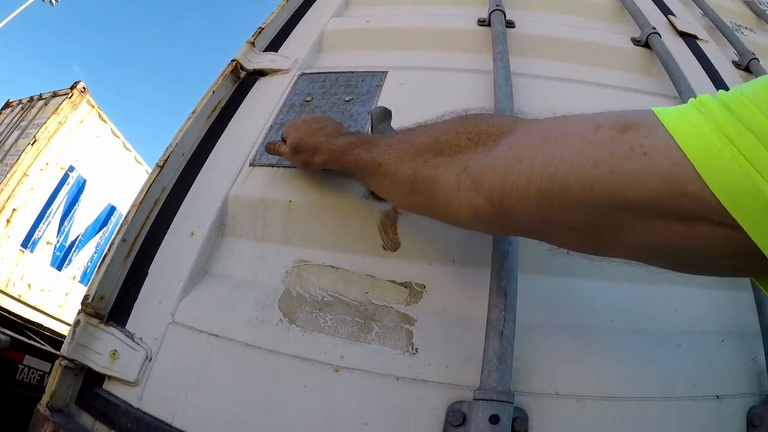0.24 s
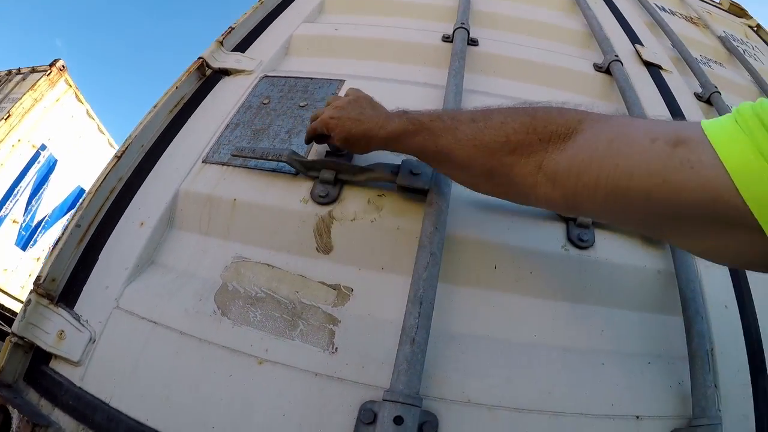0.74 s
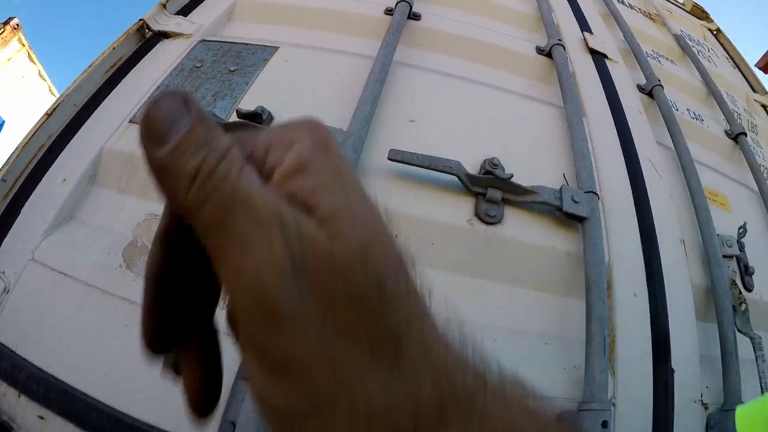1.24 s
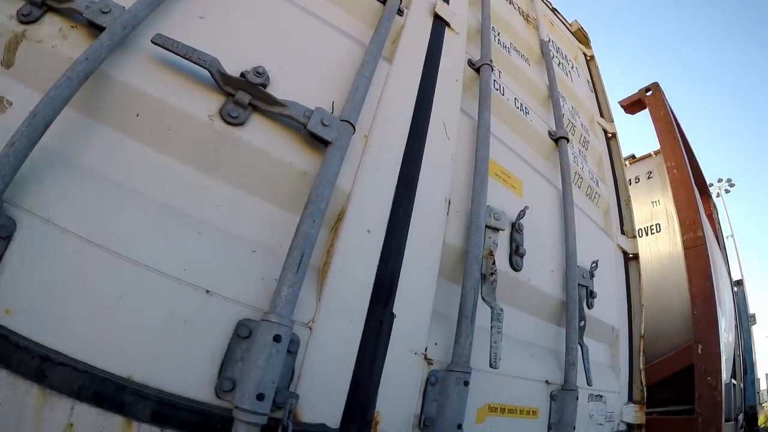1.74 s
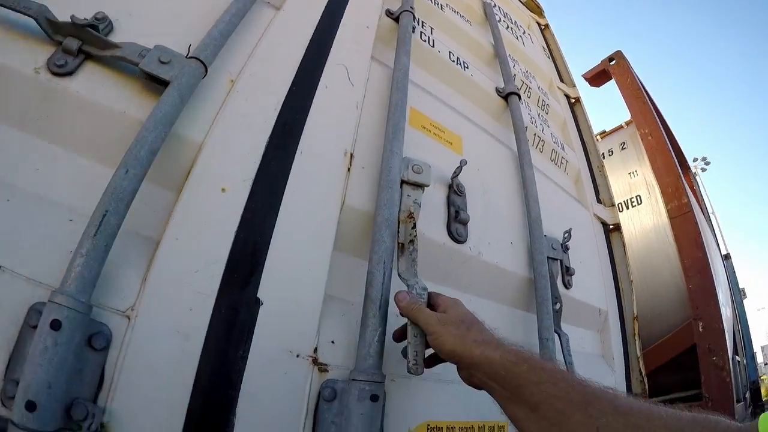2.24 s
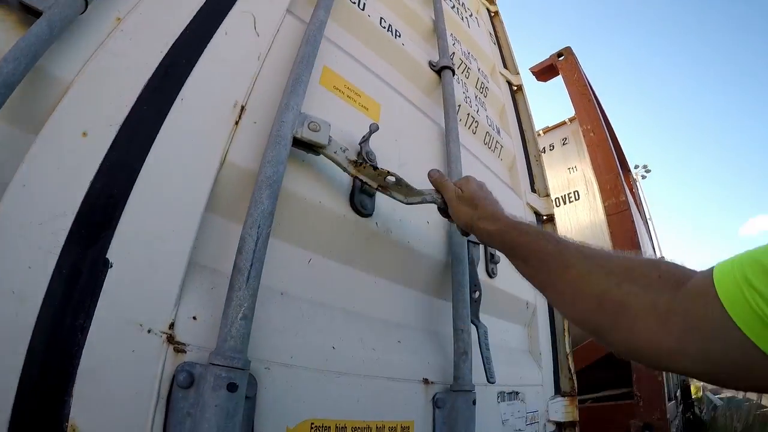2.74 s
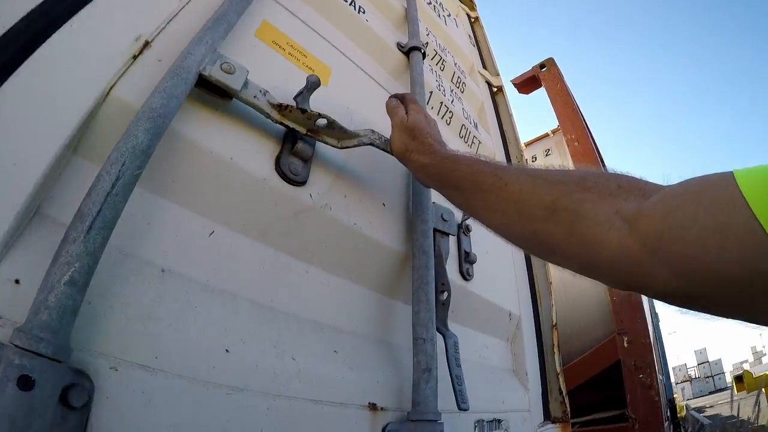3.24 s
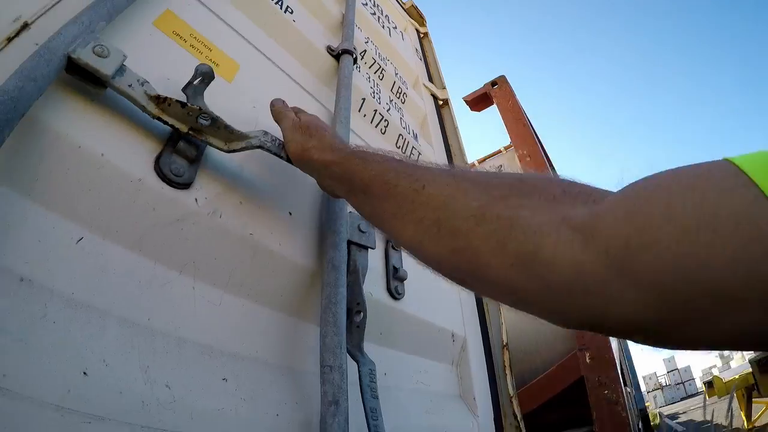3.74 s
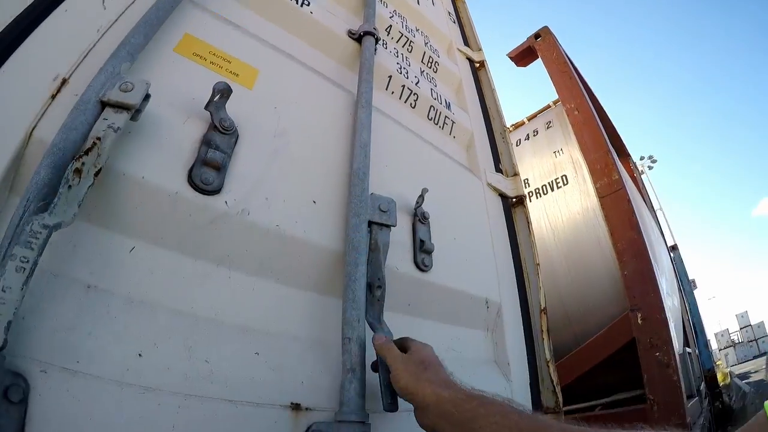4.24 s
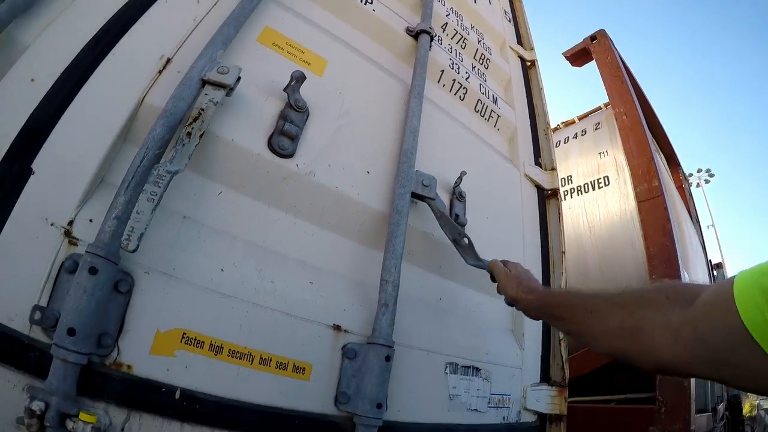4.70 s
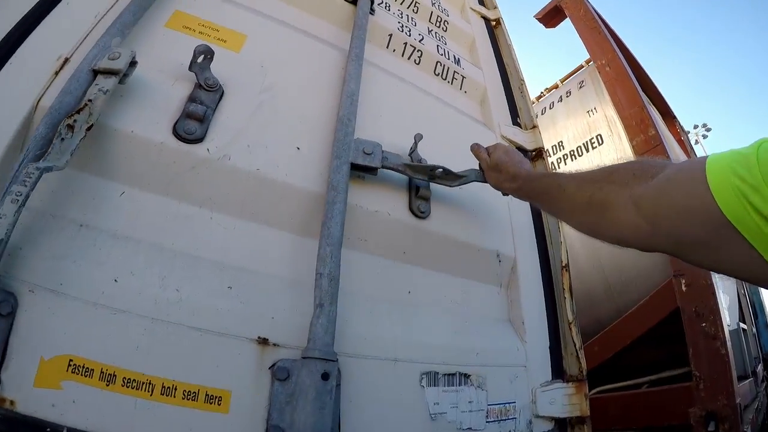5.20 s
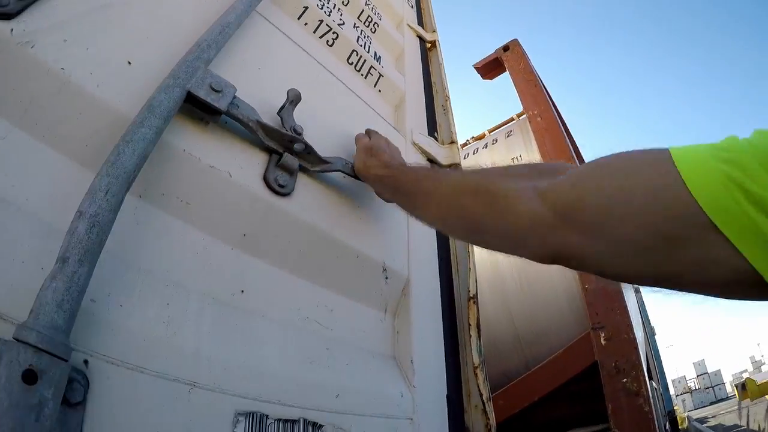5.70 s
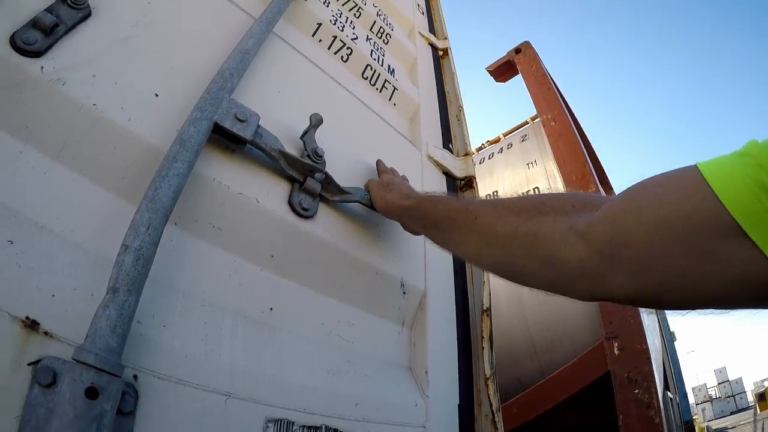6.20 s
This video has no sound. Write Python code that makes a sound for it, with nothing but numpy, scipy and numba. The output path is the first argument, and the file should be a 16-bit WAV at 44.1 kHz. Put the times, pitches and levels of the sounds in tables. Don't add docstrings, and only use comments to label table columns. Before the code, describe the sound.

Low engine drone and distant yard hum underlie sharp metal handling at arm's length. One latch knocks and rattles, another scrapes, clacks and thumps, then a steel handle falls and rings like a bar. After a quieter gap the last latch slams with hollow boom and jangling parts, followed by one more solid knock. Action-camera sound, wide, with the background ducking after blows.

```python
import sys
import numpy as np
from scipy import signal
from scipy.fft import rfft, irfft
from scipy.io import wavfile
from scipy.ndimage import uniform_filter1d
from numba import njit

SR = 44100
rng = np.random.default_rng(int(sys.argv[2]) if len(sys.argv) > 2 else 0)


def wav_record(signal):
    frames = np.transpose(np.atleast_2d(signal))
    bounded = np.clip(frames, -1, 1)
    quanta = np.round(bounded * 32767).astype(np.int16)
    wavfile.write(sys.argv[1], SR, quanta)


def level_to_linear(level):
    exponent = np.asarray(level, float) / 20
    return 10 ** exponent


N = 284886


def on_log(hz, table, column=1):
    rows = np.array(table, float)
    return np.interp(np.log(np.maximum(hz, 1)), np.log(rows[:, 0]), rows[:, column])


def curve(table):
    return np.interp(np.arange(N) / SR, *np.array(table, float).T)


def unit(x):
    return x / np.sqrt(np.mean(x ** 2))


def walk(rate):
    k = int(SR / rate)
    steps = np.repeat(rng.standard_normal(N // k + 1), k)
    return unit(uniform_filter1d(uniform_filter1d(steps, k), k)[:N])


# (frequency [Hz], left minus right level [dB], right lead [rad],
# likeness of distant sound [0-1])
MICROPHONES = [(60, .2, -.2, .93), (170, .4, -.45, .97), (270, -1.5, -.7, .8), (340, 2, 1.7, .6),
               (470, 9.5, 2.1, .85), (800, 4, 2.25, .97), (1100, 0, 2.1, .96), (1700, -1, 1.6, .85),
               (2200, 0, 1.0, .75), (4000, 1, .4, .65), (5200, 6, .3, .15), (7000, 10, 1, .1),
               (9000, 0, 1, .1), (12000, -3, 1, .1)]


def shaped_noise(gain):
    hz = np.fft.rfftfreq(N, 1 / SR)
    like = np.clip(on_log(hz, MICROPHONES, column=3), 0, 1)
    a, b = rfft(rng.standard_normal((2, N))) * gain(hz)
    return irfft(np.array([a, like * a + np.sqrt(1 - like ** 2) * b]), N)


@njit
def add(out, start, hz, gain, t60, turn, rise):
    for k in range(len(hz)):
        p = np.exp(2j * np.pi * hz[k] / SR - np.log(1000) / (t60[k] * SR))
        z, swell = gain[k], 0.
        for i in range(start, min(out.shape[1], start + int(t60[k] * SR))):
            swell += (1 - swell) * rise[k]
            out[0, i] += swell * z.imag
            out[1, i] += swell * (z * turn[k]).imag
            z *= p


def strike(out, s, hz, db, t60, rise_ms, spread=1):
    chance = rng.standard_normal((len(hz), 2)).T
    turn = np.exp(1j * spread * chance[1] * np.minimum(hz / 3300.0, 1.6))
    rise = np.minimum(1, 1000 / (rise_ms * SR)) + 0 * hz
    add(out, int(s * SR), hz, level_to_linear(db) * np.exp(3j * chance[0]), np.maximum(t60, .008), turn, rise)


# (time [s], depth [dB], its sign does not matter)
DUCKS = [
    (.08, 2),
    (.96, -0.5),
    (3.369, 0.5),
    (4.09, 5),
    (5.67, 7),
    (6.02, 5.5),
    (6.2, 0),
]


def ducking():
    attack_s, recover_s = .08, .7
    times, depths_db = np.array(DUCKS).T
    since = np.maximum(np.arange(N) / SR - times[:, None], 0)
    dip = (1 - np.exp(-since / attack_s)) * np.exp(-since / recover_s)
    return level_to_linear(-np.abs(depths_db) @ dip)


# (frequency [Hz], level per Hz [dB])
RUMBLE = [(11, -26), (18, -11.5), (67, -7), (123, -13.5), (145, -18), (238, -28.5), (285, -36), (321, -40),
          (400, -41), (520, -72), (880, -120)]
# (frequency [Hz], level per Hz [dB])
HUM = [(150, -35), (250, -5), (287, -9), (323, -13), (417, -4), (462, -5.5), (735, -7.5), (798, -15),
       (865, -5), (1300, -10), (1390, -15.5), (1950, -19.5), (4000, -31), (5200, -44), (8800, -120)]
# (frequency [Hz], level per Hz [dB])
HISS = [(2060, -24), (3500, -8.5), (5250, -2.5), (5700, -0.5), (7190, -0.5), (8310, -8), (11100, -9.5),
        (14000, -17.5)]
# (time [s], swell [dB])
BUSTLE = [(0, 1), (.6, 0), (1.3, 0), (2, 0), (2.6, 2), (3.1, 1.5), (3.6, -3), (4, 3.5), (4.5, -1), (5, 1),
          (5.5, 3.5), (6, -5.5), (6.46, -1.5)]


def yard():
    rumble_db, hum_db, hiss_db = -15.5, -39.5, -60.5
    rumble = unit(shaped_noise(lambda hz: level_to_linear(on_log(hz, RUMBLE)) * (hz > 16)))
    rumble = rumble * level_to_linear(rumble_db + 1.2 * walk(2.92))
    hum = 0
    for low in 250 * 2. ** np.arange(5):
        band = shaped_noise(lambda hz: level_to_linear(on_log(hz, HUM)) * (hz >= low) * (hz < 2 * low))
        hum = hum + band * level_to_linear(0.77 * walk(6) + 1.0 * walk(40))
    hiss = unit(shaped_noise(lambda hz: level_to_linear(on_log(hz, HISS)) / (1 + (hz / 12500) ** 12)))
    hiss = hiss * level_to_linear(1.1 * walk(33))
    swell_db = curve(BUSTLE) + .5 * walk(1.8)
    return rumble + (unit(hum) * level_to_linear(hum_db) + hiss * level_to_linear(hiss_db)) * level_to_linear(swell_db)


# (time [s], level [dB])
LOAD = [(0, -16.5), (.75, -13.5), (1.3, -18.5), (1.9, -20), (2.15, -17), (2.8, -18), (3.1, -14.5),
        (3.45, -28.5), (4, -18), (4.4, -21.5), (4.8, -11), (5.3, -22), (5.65, -18), (6, -21.5),
        (6.46, -12.5)]
# (frequency [Hz], width [Hz], level [dB], drift over the scene [dB])
WHINES = [
    (89.8, 7.6, -29, .1),
    (121.6, 3.5, -30.5, .1),
    (817, 30, -46.5, -4),
    (1995, 60, -58, 4),
]


def engines():
    speed = 1 + 0.008 * walk(2.377)
    turned = np.cumsum(speed) / SR
    notes = 0
    for hz, db in ((30.27, -16), (59.68, curve(LOAD))):
        notes = notes + np.sqrt(2) * level_to_linear(db + 2.0 * walk(7.0)) * np.sin(2 * np.pi * hz * turned)
    whines = 0
    for hz, width, db, drift_db in WHINES:
        tone = unit(shaped_noise(lambda f: 1 / np.sqrt(1 + (2 * (f - hz) / width) ** 4)))
        whines = whines + level_to_linear(db + drift_db * np.arange(N) / N + 3.2 * walk(8)) * tone
    return notes * ducking() ** 1.6 + whines * ducking()


# (start [s], length [s], level [dB])
SLIDES = [(0.11, 0.083, -51.5), (0.806, 0.23, -60), (1.803, 0.092, -59), (2.355, 0.1, -54),
          (2.61, 0.33, -57), (3.7, .2, -49.5), (3.886, 0.026, -45.5), (3.952, .13, -49), (5.32, 0.43, -59),
          (5.464, .05, -49.5), (5.74, .11, -52), (6.39, .1, -50.5)]


def slides():
    attack_s, release_s = 0.023, .03
    colour = [(1500, -33.5), (4500, -14.0), (7000, 5.5), (10000, -0.5), (13000, -34)]  # (Hz, dB)
    hiss = unit(shaped_noise(lambda hz: level_to_linear(on_log(hz, colour))))
    t = np.arange(N) / SR
    push = 0
    for s, length, db in SLIDES:
        fade = np.minimum((t - s) / attack_s, 1 + (s + length - t) / release_s)
        push = push + level_to_linear(db) * np.clip(fade, 0, 1)
    specks = np.zeros((2, N))
    for when, pitch, size in rng.random((1500, 3)):
        hz = 4000 * 2.8 ** pitch * np.ones(1)
        strike(specks, when * N / SR, hz, 0.5 + 9 * size + 0 * hz, t60=0.023 + 0 * hz, rise_ms=0.98)
    flicker = level_to_linear(2.7 * walk(400) + 2.8 * walk(49) - 10.5)
    return (hiss * flicker + specks * level_to_linear(-10.5)) * push


# (time [s], level [dB], frequency [Hz],
# cluster width [Hz], time to die by 60 dB [s])
CHINKS = [(0.069, -48, 9500, 4940, 0.022), (.073, -43, 6020, 1200, 0.024), (0.074, -45, 8100, 900, 0.025),
          (.152, -52, 7470, 150, .05), (.072, -33, 507, 600, 0.15), (.796, -27, 654, 594, 0.11),
          (0.9448, -31, 6170, 2500, 0.053), (.9452, -52, 12000, 4000, 0.013),
          (.963, -40, 5500, 3520, 0.071), (.9795, -28.5, 4450, 600, 0.05), (.9795, -35, 6550, 1500, .04),
          (.99, -44, 5000, 3970, 0.07), (1.022, -50, 5500, 4000, 0.1), (1.043, -53, 6400, 800, .03),
          (1.089, -53, 4300, 500, 0.037), (2.36, -38, 1450, 700, 0.04), (2.397, -44.5, 3970, 800, 0.05),
          (2.401, -34, 1300, 980, .1), (2.516, -44, 3310, 2200, 0.022), (2.542, -35.5, 3480, 1600, 0.068),
          (2.548, -33.5, 1100, 900, 0.14), (2.622, -40, 4500, 900, 0.039), (2.678, -48, 2670, 1200, 0.04),
          (3.351, -33.5, 780, 900, 0.052), (2.798, -52, 6960, 3500, .02),
          (3.887, -47, 3050, 180, .04), (3.895, -41.5, 8550, 400, .025),
               (3.908, -33.5, 3075, 110, 0.068), (3.973, -48, 6815, 300, 0.024),
               (4.081, -28.5, 8500, 7460, 0.082), (4.083, -29, 4500, 1500, 0.11),
               (4.098, -35, 8550, 7050, 0.062), (4.12, -41.5, 8600, 3020, 0.33),
               (5.653, -31, 6790, 995, .04), (5.666, -31, 6540, 997, 0.077),
               (5.665, -36, 9830, 1490, 0.053), (5.687, -29.5, 6230, 2800, 0.055),
               (5.694, -34.5, 9360, 2010, 0.053), (5.712, -36.5, 4380, 300, 0.14),
               (5.7, -39, 4400, 350, .05), (5.7, -37.5, 6450, 6480, 0.16), (5.79, -48, 3600, 2600, 0.2),
               (5.69, -31, 711, 602, 0.31), (5.7, -35, 1400, 1400, 0.26), (5.72, -37, 2300, 700, 0.3),
               (5.655, -52.5, 13060, 2520, 0.11), (5.688, -55, 13500, 2490, .1),
               (5.733, -55, 12000, 3010, 0.053)]


def chinks(count=40):
    out = np.zeros((2, N))
    for s, db, hz, width, t60 in CHINKS:
        chance = rng.random((count, 3)).T - .5
        pitch = np.clip(hz + width * chance[0], 100, 15000)
        strike(out, s, pitch, db - 7 + 10 * chance[1], t60 * np.exp(.8 * chance[2]), rise_ms=40 * t60)
    return out


# (time [s], level [dB], rise [ms], # tones
# (frequency [Hz], level [dB], time to die by 60 dB [s]))
RINGS = [
    (.797, -26, 3, [(463, -8, .2), (517, 0, .1), (603, -4, .16), (991, -2, .08), (2100, -8, .05)]),
    (.981, -33, 1.5, [(4350, 0, .07), (4650, -2, .06), (3900, -4, .09), (4100, -3, .1)]),
    (2.542, -35, 1.5, [(3000, -2, .04), (3400, 0, .06), (3900, -4, .06), (4700, -4, .05), (2050, -2, .06)]),
    (2.622, -36, 2, [(1825, 0, .15), (3138, -6, .04), (4550, -4, .075)]),
    (4.082, -37, 6, [(4829, -1, 0.21), (5179, 0, 0.26), (5233, -13, 0.5), (5340, -10, 0.78), (5556, -9, 0.26), (5722, -12, 5.0), (6056, -13, 0.31), (6202, -7, 0.31), (6277, -16, 0.57)]),
    (4.082, -36, 3, [(8640, -9, 0.4), (8796, -8, 0.22), (8969, -8, 0.48), (9049, -6, 0.83), (9092, 0, 0.26), (9205, -12, 5.0), (9448, -1, 0.11), (9668, -3, 0.079), (9781, -7, 0.22), (9889, 0, 0.16)]),
    (4.082, -46, 3, [(10970, 0, 0.073), (11440, -14, 0.64), (11640, -20, 0.049), (11740, -61, 5.0), (11810, -29, 0.11), (11890, -3, 0.16), (12110, -12, 0.24)]),
         (5.702, -25.5, 10, [(2186, 0, .33), (2300, 0, .08), (3009, -18, .26), (3278, -20, .22), (3618, -14, .17), (3828, -19, .26)]),
    (5.712, -29, 12, [(4296, -12, .17), (4360, 0, .1), (4463, -10, .17), (4673, -14, .16)]),
    (5.746, -36, 3, [(4400, 0, .05), (4500, -3, .05)]),
    (6.012, -32, 5, [(614, -4, .36), (910, 0, .3), (1157, 0, .33), (1238, -2, .28), (1330, -7, .31), (1513, -11, .28), (2186, -10, .24)]),
    (6.036, -22, 4, [(167, 0, .2), (215, -2, .25), (880, -12, .12)]),
    (6.09, -34, 30, [(255, 0, .3), (1120, -10, .2)]),
]


def rings():
    out = np.zeros((2, N))
    for s, level_db, rise_ms, modes in RINGS:
        hz, db, t60 = np.array(modes, float).T
        strike(out, s, hz, level_db + db, np.minimum(t60, .36), rise_ms, spread=.5)
    return out


# (time [s], peak level [dB], frequency [Hz], time to die by 60 dB [s])
BOOMS = [
    (0.067, -6, 147.6, 0.19),
    (0.535, -14.5, 126.2, 0.45),
    (2.651, -9.5, 127.2, 0.67),
    (3.357, -2, 104, 0.21),
    (4.082, -6.5, 135.7, 0.59),
    (5.642, -5, 134.4, 0.61),
    (5.689, -8, 116.2, 0.25),
    (6.008, -2.5, 169, 0.17),
    (6.038, -13, 152, 0.66),
]


def box():
    out = np.zeros((2, N))
    ratio = np.array([.8, 1, 1.27, 1.6, 1.95])
    balance_db = np.array([-18.5, -2.5, -14, -14.0, -21.0])
    for s, db, hz, t60 in BOOMS:
        strike(out, s, hz * ratio, db + balance_db, t60 / ratio ** 0.12, rise_ms=3.1)
    return out


# (time [s], level [dB], rise [ms],
# tones (frequency [Hz], level [dB], time to die by 60 dB [s]))
BAR = [
    (4.080, -19, 2.6, [(4829, -20, .25), (5179, -19, .24), (5340, -21, .3), (5728, -21, .42), (6815, 0, .22), (6971, -5, .16), (7730, -15, .33), (7870, -6, .5), (8037, -23, .35), (8156, -16, .28), (8398, -16, .3), (8522, -14, .3)]),
    (4.080, -19.5, 2, [(8969, -20, .3), (9049, -18, .33), (9211, -17, .3), (9448, -25, .25), (9889, -15, .18), (10180, -6, .26), (10500, -21, .27), (11440, -32, .3), (11890, -26, .24), (12540, -31, .22), (13150, -34, .2), (13820, -19, .26)]),
    (4.082, -22, 1.1, [(1538, 0, 0.16), (2002, -6, 0.29), (2187, 8.5, 0.085)]),
]
# (time [s], level [dB], rise [ms],
# tones (frequency [Hz], level [dB], time to die by 60 dB [s]))
CATCHES = [
    (.15, -52.0, 8.0, [(6300.0, 0.0, .12), (7500.0, 0.0, .1)]),
    (2.623, -42.0, 2.0, [(4500.0, 0.0, .05), (5949.0, -10.0, .1)]),
    (2.808, -52.0, 6.0, [(8500.0, 0.0, .14)]),
    (3.697, -48.0, 3.0, [(5600.0, 0.0, .06)]),
    (3.895, -43.0, 2.0, [(8550.0, 0.0, .06), (4500.0, -2.0, .05)]),
    (3.9, -25.0, 12.0, [(3068.0, 0.0, .09), (6212.0, -18.0, .12)]),
    (3.977, -27.0, 8.0, [(2140.0, 0.0, .09), (3400.0, -9.0, .03), (4150.0, -14.0, .1), (6815.0, -17.0, .16)]),
    (4.448, -46.0, 4.0, [(2900.0, 0.0, .05)]),
    (4.639, -39.0, 3.0, [(2400.0, 0.0, .11), (3550.0, -9.0, .11)]),
]
# (time [s], level [dB], rise [ms],
# tones (frequency [Hz], level [dB], time to die by 60 dB [s]))
PLATES = [
    (.07, -15.0, 2.0, [(225.0, 0.0, .17), (270.0, -2.0, .15), (1150.0, -14.0, .2)]),
    (.797, -23.0, 3.0, [(525.0, 0.0, .13), (612.0, -1.0, .13), (980.0, -4.0, .08)]),
    (.981, -33.0, 2.0, [(4300.0, 0.0, .06), (4700.0, -2.0, .05)]),
    (2.69, -30.0, 4.0, [(1000.0, 0.0, .15)]),
    (5.552, -24.0, 1.2, [(880.0, 0.0, .05), (1000.0, -3.0, .05)]),
    (5.655, -24.0, 3.0, [(610.0, 0.0, .3), (694.0, 0.0, .4)]),
    (5.70, -30.0, 12.0, [(436.0, -4.0, .45), (2186.0, -9.0, .32), (2466.0, -7.0, .25), (2643.0, -4.0, .2)]),
    (5.735, -41.0, 25.0, [(9150.0, -4.0, .22), (9330.0, -8.0, .25), (8985.0, 0.0, .3), (8800.0, -1.0, .25)]),
    (6.014, -26.0, 4.0, [(215.0, 7.0, .35), (250.0, 0.0, .4), (910.0, -6.0, .25), (1163.0, -6.0, .25)]),
]


def handles():
    out = np.zeros((2, N))
    for s, level_db, rise_ms, modes in BAR + CATCHES + PLATES:
        hz, db, t60 = np.array(modes, float).T
        t60 = np.minimum(t60, .55)
        strike(out, s, hz, level_db + db, t60, rise_ms, spread=0.75)
        twin_hz = hz * (1 + .0045 * rng.standard_normal(len(hz)))
        strike(out, s, twin_hz, level_db + db - 5, .7 * t60, rise_ms)
    return out


# (time [s], strength [dB], weight behind it [dB],
# hardness [dB], ring [s])
TAPS = [(0.0835, -25, -4, -20, 0.26), (0.1084, -48.5, 28, -19, 0.1), (0.523, -40, 8.5, -15, 0.2),
        (0.715, -32.5, -16, -13, 0.13), (0.7606, -28, -3, -22, 0.16), (0.811, -38.5, 13, -26, 0.11),
        (0.8647, -37.5, 0, -21, 0.33), (0.892, -37, 1.5, -16, 0.84), (.93, -37.5, 3.5, -10, 0.22),
        (.962, -26, 4.5, -7.5, 0.11), (1.0075, -36.5, 11, -17, 0.12), (1.045, -31.5, 4.5, -20, 0.12),
        (1.0969, -35.5, 8, -21, 0.067), (1.1887, -35, 5.5, -9, 0.042), (1.202, -35, 3.5, -10, 0.093),
        (1.213, -35.5, -5, -9, 0.15), (1.3163, -39.5, 12, 1, 0.059), (1.3232, -32.5, -5, -11, 0.16),
        (1.332, -40.5, 2, -8, 0.068), (1.866, -56, 15, 1, 0.19),
        (2.36, -34, 3, -18, .12), (2.397, -34.5, 5, -15, 0.32), (2.442, -37, 6, -8, 0.029),
               (2.515, -35, 7.5, -5.5, .04), (2.56, -32, 6.5, -24, 0.17),
               (2.6195, -26.5, -1.5, -22.5, 0.32), (2.6455, -35.5, 6.5, -15, 0.25),
               (2.6817, -31.5, 3.5, -30, 0.19), (3.0562, -50, 16, 3, 0.08), (3.2618, -29, 1.5, -19, 0.045),
               (3.3388, -35.5, 7, -6, 0.067), (3.352, -48, 26, -0.5, 0.17), (3.4817, -40.5, 2, -19, 0.25),
               (3.7012, -46.5, 4.5, -11, 0.12), (3.894, -35.5, -3, -13.5, 0.67),
               (3.9729, -37, 5, -12.5, 0.12),
        (4.639, -40, -0.5, -18, .2),
    (5.4918, -41.5, 4, -4, .059),
    (5.552, -26, -0.5, -20, .047),
    (5.749, -41, 1, -4, .05),
    (6.0344, -27, 1, -19, 0.16),
    (6.0674, -36, 0, -31, 0.21),
]
# (time [s], strength [dB], weight
# behind it [dB], hardness [dB], ring [s])
BLOWS = [(0.069, -21, 5, -8, 0.2), (0.7932, -25, 1, -12.5, 0.21), (0.9453, -25.5, 0.5, -6.5, 0.31),
         (0.979, -23, 1.5, -6, 0.21), (2.542, -27.5, 2.5, -13, 0.24), (4.079, -16.5, -6, -7.5, 0.38),
         (4.0797, -12, -13.5, 4, 0.013), (5.6529, -21, 4.5, -8.5, 0.21), (5.667, -22.5, -2, -6, 0.27),
         (5.686, -22, 5.5, -0.5, 0.21), (5.707, -23.5, -11.5, -13, 0.17), (5.733, -24.5, -3, -8, 0.33),
         (5.7593, -31.5, 5.5, -23, 0.35), (5.7995, -35, 7, -30, 0.28), (6.0091, -25.5, 3.5, -3, 0.22)]


def door(count=900):
    out = np.zeros((2, N))
    for s, clank_db, weight_db, hard_db, t60 in TAPS + BLOWS:
        top_db = 0.42 * (clank_db + 20) / 2
        knock_db = clank_db + weight_db
        click_db = clank_db + hard_db - top_db
        tick_db = clank_db + hard_db + top_db
        chance = rng.standard_normal((count, 2)).T
        hz = 170 + 14000 * rng.random(count) ** 1.4
        # (Hz, dB)
        colour = [(170, knock_db - 4.0), (350, knock_db - 14.5), (800, knock_db - 12.5),
                  (1650, clank_db - 18.5), (2300, clank_db - 18.0), (4200, click_db - 18.0),
                  (7000, tick_db - 16.0), (10300, tick_db - 23.5), (14200, tick_db - 46.0)]
        ring = t60 * (hz / 2000) ** -.35 * np.exp(.16 * chance[0]) / (1 + (hz / 9000) ** 2 * .6)
        crack = np.arange(count) % 3 == 0
        crack_db = 9 * crack * np.minimum(hz / 900, 1)
        ring = np.where(crack, .24 * ring, ring)
        lumps_db = 2.3 * np.interp(np.log(hz), np.linspace(5, 9.6, num=30), rng.standard_normal(size=30))
        db = on_log(hz, colour) - 7.0 + 1.0 * chance[1] + crack_db + lumps_db
        strike(out, s, hz, db, ring, rise_ms=.5 + 800 / hz)
    return out


def scene():
    background = yard() * ducking() + engines()
    return background + slides() + chinks() + rings() + box() + handles() + door()


def top_cut(x):
    return signal.sosfilt(signal.butter(12, 14830, fs=SR, output="sos"), x)


def record(dry):
    margin = 4096
    padded = np.pad(dry, ((0, 0), (margin, margin)), mode="reflect", reflect_type="odd")
    hz = np.fft.rfftfreq(padded.shape[1], 1 / SR)
    lead = on_log(hz, MICROPHONES, column=2)
    right = level_to_linear(-on_log(hz, MICROPHONES)) * np.exp(1j * lead)
    like = np.clip(on_log(hz, MICROPHONES, column=3), 0, 1)
    left = 2 / np.sqrt(1 + abs(right) ** 2 + 2 * like * right.real)
    pair = left * np.exp(-.5j * lead) * np.array([np.ones_like(right), right])
    wide = irfft(rfft(padded) * pair, padded.shape[1])
    rounded = np.tanh(.7 * wide) / .7
    treble_cut = signal.ellip(6, .3, 45, 14900, fs=SR, output="sos")
    mix = signal.sosfilt(treble_cut, rounded)[:, margin:-margin]
    start = np.minimum(np.arange(N) / (.006 * SR), 1)
    mix = mix * np.sin(np.pi / 2 * start) ** 2
    return top_cut(mix)


dry = scene()
out = record(dry)
wav_record(out)
```